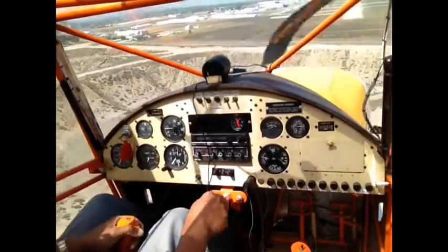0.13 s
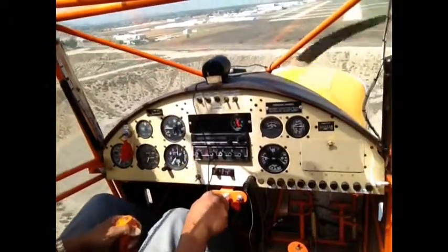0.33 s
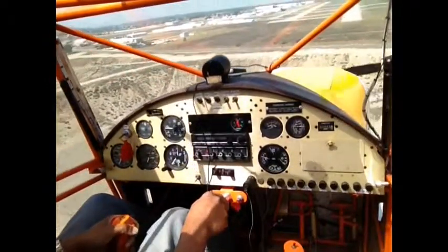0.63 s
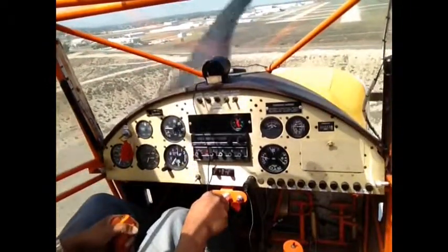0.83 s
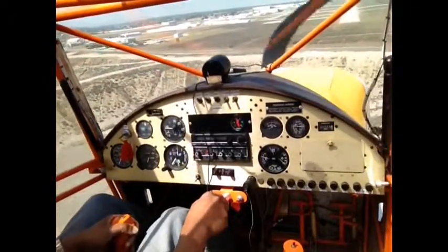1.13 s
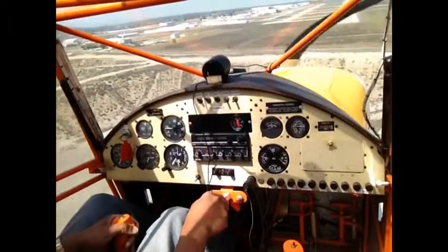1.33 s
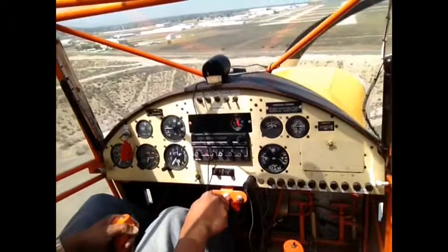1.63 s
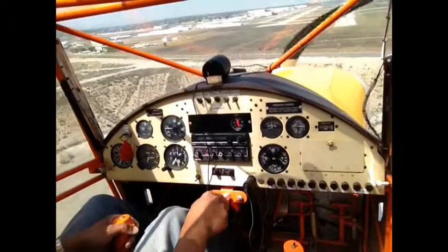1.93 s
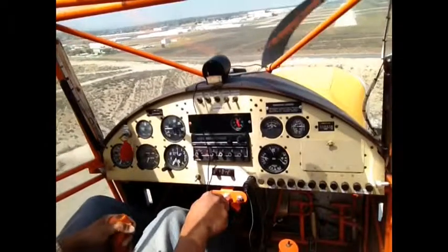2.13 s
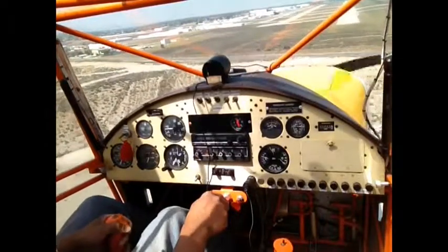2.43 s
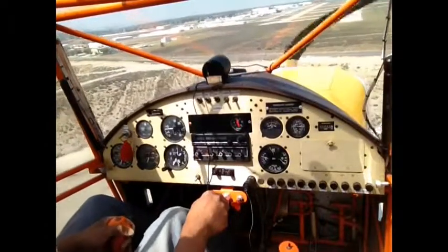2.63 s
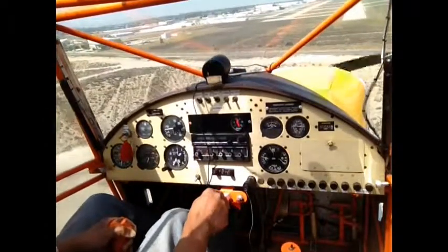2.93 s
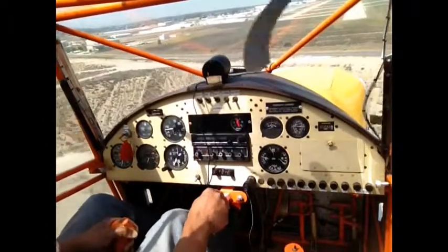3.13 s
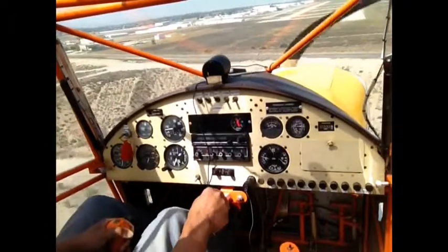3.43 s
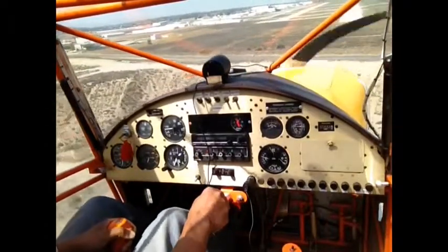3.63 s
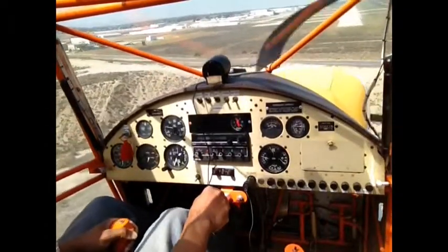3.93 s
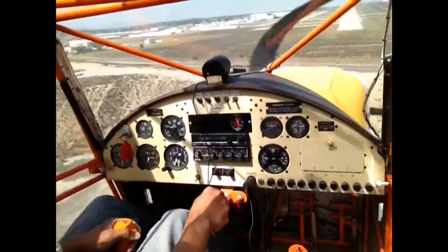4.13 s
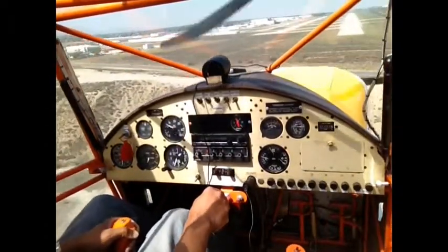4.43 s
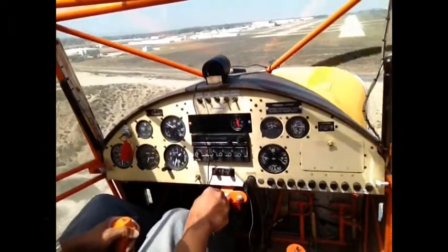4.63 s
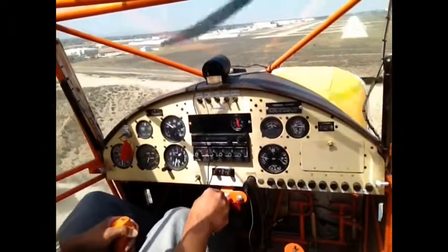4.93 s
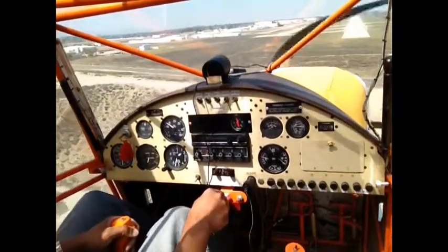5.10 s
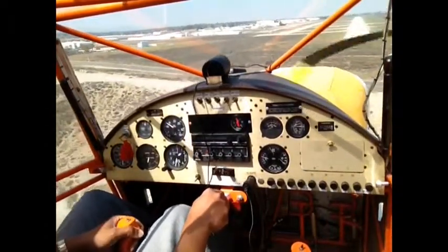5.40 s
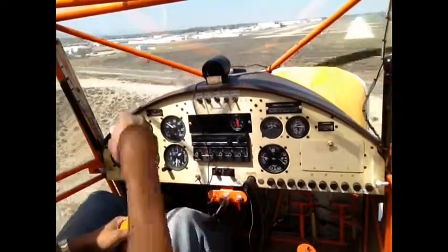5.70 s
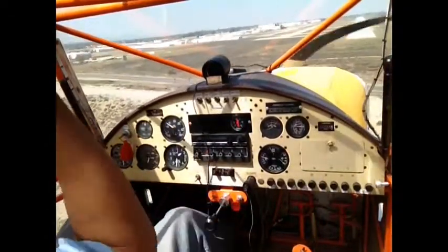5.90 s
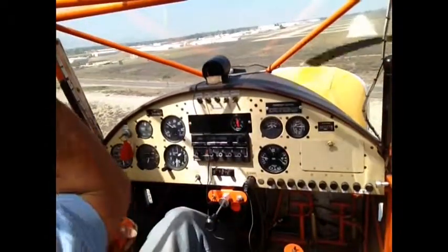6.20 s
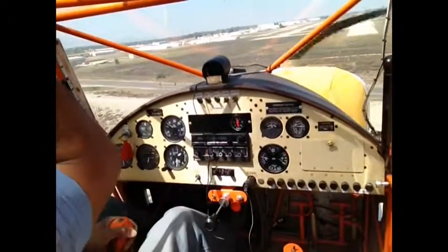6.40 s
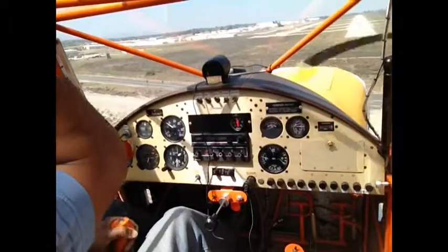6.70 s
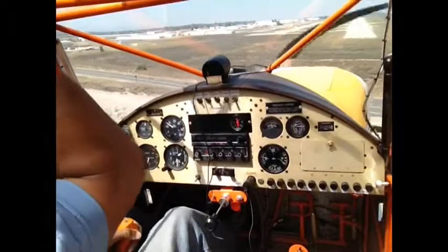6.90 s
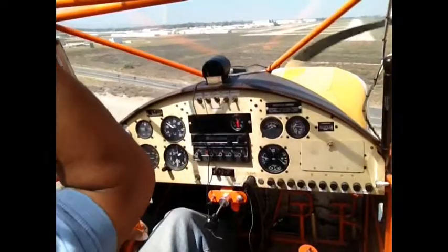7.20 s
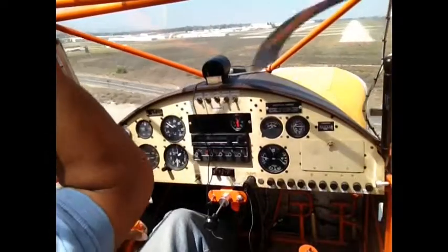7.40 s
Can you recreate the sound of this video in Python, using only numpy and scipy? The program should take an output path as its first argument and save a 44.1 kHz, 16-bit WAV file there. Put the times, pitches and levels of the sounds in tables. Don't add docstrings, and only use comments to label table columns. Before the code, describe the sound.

Inside a small propeller plane on approach, the engine idles low under rumbling, hissing slipstream and faint door-gap whistles, with a few tiny trim ticks. Near the middle the throttle opens and the drone climbs to a strong steady roar. The close cabin microphone overloads, stuttering with brief dropouts and popping thuds, including two harder flurries of knocks late on.

```python
import sys
import numpy as np
from scipy import signal
from scipy.fft import rfft, irfft, next_fast_len
from scipy.io import wavfile
from scipy.ndimage import uniform_filter1d, map_coordinates

SR = 44100
rng = np.random.default_rng(int(sys.argv[2]) if len(sys.argv) > 2 else 0)


def unload_wav(signal):
    wavfile.write(
        sys.argv[1],
        SR,
        np.round(np.clip(np.atleast_2d(signal).T, -1, 1) * 32767).astype(np.int16),
    )


def decibels_to_gain(level_db):
    exponent = np.asarray(level_db, float) / 20
    return 10 ** exponent


N = 332955

# time_s, firing_hz
FIRING_RATE = [(0, 31.5), (1, 30.4), (1.7, 29.2), (2.3, 28.18), (3.3, 27.3), (3.55, 28.46), (3.8, 33.47),
               (4, 37.65), (4.3, 41.4), (4.6, 43.3), (4.85, 44.43), (5.3, 43.87), (6.2, 43.42),
               (7.55, 43.45)]
# time_s, load_0_to_1
THROTTLE_LOAD = [(0, 0.15), (.5, 0), (1.1, .15), (1.7, 0.44), (2.3, 0.08), (3.3, 0.17), (3.6, 0.1),
                 (3.95, .65), (4.4, 0.99), (7.55, 0.94)]
# firing_rate_multiple, level_db
ENGINE_ORDERS = [(1, -19), (1.5, -36), (2, -9), (2.5, -16), (3, 0.5), (3.5, -20.5), (4, -21.5),
                 (4.5, -14.5), (5, -15), (6, -19.5)]
# time_s, level_db
SLIPSTREAM = [(0.0, -35), (0.71, -34), (1.14, -35), (1.45, -35.5), (3.55, -37), (4.5, -33), (4.88, -33.5),
              (6.01, -35.5), (6.5, -34.5), (6.69, -34.5), (7.42, -34.5), (7.55, -31.5)]
# time_s, level_db
GAP_DRAUGHT = [(0, 1.5), (.7, 3.5), (1.6, -4), (2.2, 1), (3.15, -1), (3.75, 0), (5, 3), (7.55, -1.5)]
# freq_hz, density_db
IDLE_RUMBLE = [(20, -40), (40, -7), (65, -20), (85, -8.5), (110, 0), (145, 2), (200, -3.5), (260, -12),
               (340, -17.5), (500, -32), (900, -59)]
# freq_hz, density_db
POWER_RUMBLE = [(20, -45), (40, -31), (65, -15), (85, -10.5), (110, -3), (140, 0), (185, -0.5), (230, -7),
                (330, -15), (500, -35.5), (900, -58)]
# freq_hz, density_db
HULL_SPECTRUM = [(150, -15.5), (260, -19.5), (323, -2), (422, -5.5), (493, 1), (564, -8), (620, -8),
                 (811, -16.5), (1000, -19.5), (1100, -24.5), (1300, -35), (1690, -45), (2860, -120)]
# freq_hz, density_db
PANEL_SPECTRUM = [(700, -47), (1100, -3.5), (1600, -3), (2000, -6), (2400, -9.5), (3000, -13), (4100, -18),
                  (4400, -29), (6000, -58)]
# freq_hz, density_db
LEAK_SPECTRUM = [(3000, -23), (4300, -4.5), (5000, -2), (6100, -4), (8300, -1.5), (9100, -1.5), (10700, 3),
                 (12500, -3), (13500, -5), (15200, -12), (16000, -40)]
# centre_hz, width_hz, level_db
GAP_CAVITIES = [(1783, 150, 3), (2642, 240, 4), (4076, 68, -13.5), (4950, 260, -10.5), (8380, 250, -14)]
# start_s, peak_db
TRIM_TICKS = [
    (0.2493, -33),
    (0.9744, -48),
    (1.4321, -39),
    (1.4784, -46),
    (1.6317, -34),
    (1.6994, -45),
    (2.1708, -50),
    (4.5707, -39),
]
STOP_BRUSHES = [.1172, 0.1394, 0.148, 0.976, 3.8943, 3.9819, 4.0858, 4.3479, 4.544, 4.5632, 4.5927, 4.6993,
                4.972, 5.3315, 5.4533, 5.5325, 5.5398, 5.6515, 5.9329, 6.156, 6.1735, 6.1802, 6.3378,
                6.4407, 6.4742, 6.61, 6.7296, 7.1679, 7.2771, 7.4828]
# start_s, length_ms, depth_db, slope_per_ms
STOP_PINS = [(3.6006, 4.9, -24, 0.38), (4.826, 23, -35, 0.45), (4.8621, 16, -17, -0.17),
             (5.033, 19.5, -55, -.25), (5.0584, 30.7, -73, 0.5), (5.1057, 4.7, -35, 0.51),
             (5.123, 27.2, -57, -0.65), (5.3509, 20.6, -23.5, -0.56), (5.4694, 17.5, -27, 0.62),
             (5.5584, 20.1, -28, 0.65), (5.5896, 17.2, -44, 0.43), (6.0339, 21, -41, -0.73),
             (6.6564, 17, -24, 0.67), (5.7442, 9.4, -12, 0.7), (6.7661, 2.9, -25, -0.6),
             (6.7716, 14.2, -29, -0.026), (6.7987, 14, -21, 0.53), (6.856, 15.6, -29, -0.4),
             (6.8848, 10.6, -25, 0.43), (7.0011, 9.4, -39, -0.39), (7.0205, 19, -36, 0.76),
             (7.0676, 10.1, -17, .6), (7.0855, 18.6, -21.5, -0.45), (7.1314, 16.8, -38, -.45),
             (7.2469, 18, -21, -0.0015), (7.2955, 16.3, -48, 0.42), (7.355, 10.6, -30, -0.39),
             (7.408, 3.56, -30, -0.46), (7.5143, 22.5, -38, .2), (7.5439, 4.85, -33, -0.43)]
# start_s, length_ms, depth_db, stopped_slope_per_ms, resumed_slope_per_ms
STOP_SLAMS = [
    (6.3571, 4.9, -20, -.8, -1),
    (6.3688, 11.5, -16, -1.5, -2.5),
    (6.3815, 6.9, -36, 2.5, 2),
    (6.39, 5.7, -25, -1, -0.5),
    (6.3985, 12, -33, 1.3, 1),
    (6.418, 9.5, -26, -.7, 0),
    (6.9495, 9.67, -36, -1.5, -1),
    (6.9605, 0.74, -2, 0.3, 1.2),
    (6.9624, 5.67, -26, -1.5, -1.66),
    (6.9696, 15.2, -25, 1.9, -0.25),
]

TONE_DB, TONE_LOAD_DB = -40, 17
RUMBLE_DB, RUMBLE_LOAD_DB = -28.5, 3
HULL_DB, PANEL_DB, LEAK_DB, WHISTLE_DB = -35, -49, -56, -58
RUMBLE_GROWS, HULL_GROWS, PANEL_GROWS, LEAK_GROWS, WHISTLE_GROWS = 1, 0.77, 0.79, 0.43, 1.4
BRUSH_MS, BRUSH_DB, BRUSH_SLOPE_PER_MS = (4.5, 9.07), -15.5, (0.067, 0.41)
CREEP_MS = 0.9
SNAP = 0.008
AIR_CUT_HZ, MIC_CUT_HZ, TOP_HZ = 64.0, 175.4, 15300


def unit(x):
    return x / np.sqrt(np.mean(x ** 2) + 1e-20)


def curve(rows):
    time_s, value = np.transpose(rows)
    return np.interp(np.arange(N) / SR, time_s, value)


def wobble(rate_hz):
    coarse = np.arange(0, N + 64, 64)
    knots = rng.standard_normal(int(N * rate_hz / SR) + 4)
    return np.interp(np.arange(N), coarse, map_coordinates(knots, [coarse * rate_hz / SR]))


def filtered(x, response):
    m = next_fast_len(N + SR)
    return irfft(rfft(x, m) * response(np.fft.rfftfreq(m, 1 / SR)), m)[..., :N]


def bass_cut(hz, corner_hz):
    s = 1j * hz / corner_hz
    first = s * s + 2 * np.cos(np.pi / 8) * s + 1
    second = s * s + 2 * np.cos(3 * np.pi / 8) * s + 1
    return s ** 4 / (first * second)


def rush(spectrum, patchy_db):
    z = signal.stft(rng.standard_normal(N + 512), nperseg=512)[2]
    field = uniform_filter1d(rng.standard_normal(z.shape), size=6, axis=0)
    field = uniform_filter1d(field, size=10, axis=1)
    noise = signal.istft(z * decibels_to_gain(patchy_db * unit(field)), nperseg=512)[1][:N]
    freq_hz, db = np.transpose(spectrum)
    return unit(filtered(noise, lambda hz: decibels_to_gain(np.interp(np.log(hz + 1), np.log(freq_hz + 1), db))))


def engine_tones(turn, firing_hz):
    load_db = 0.76 * (firing_hz - 44)
    tones = np.zeros(N)
    for order, db in ENGINE_ORDERS:
        order_db = db + 0.71 * wobble(5)
        if order != 3:
            order_db = order_db + load_db
        tones += decibels_to_gain(order_db) * np.sin(order * turn + rng.uniform(0, 2 * np.pi))
    return tones


def hull_rumble(gust, beat, firing_hz):
    power = np.clip((firing_hz - 32) / 11, 0, 1)
    idle = np.sqrt(1 - power) * rush(IDLE_RUMBLE, patchy_db=0.6)
    boom = np.sqrt(power) * rush(POWER_RUMBLE, patchy_db=0.6)
    return unit(decibels_to_gain(0.6 * gust + 0.6 * wobble(12) + 1.2 * beat) * (idle + boom))


def hull_resonance(gust, beat):
    return unit(decibels_to_gain(0.28 * gust + 0.82 * beat) * rush(HULL_SPECTRUM, patchy_db=1.36))


def panel_buzz(gust, beat):
    return unit(decibels_to_gain(0.31 * gust + 0.9 * beat) * rush(PANEL_SPECTRUM, patchy_db=1.3))


def leak_hiss(gust, beat):
    return unit(decibels_to_gain(0.5 * gust + 0.22 * beat) * rush(LEAK_SPECTRUM, patchy_db=0.7))


def whistles():
    draught = rng.standard_normal(N)
    total = np.zeros(N)
    for centre_hz, width_hz, db in GAP_CAVITIES:
        def cavity(hz):
            return (hz * width_hz / (centre_hz ** 2 - hz * hz + 1j * hz * width_hz)) ** 2
        total += decibels_to_gain(db + 1.3 * wobble(3.2)) * unit(filtered(draught, cavity))
    return total


def cabin():
    firing_hz, load = curve(FIRING_RATE), np.clip(curve(THROTTLE_LOAD), 0, 1)
    air_db = curve(SLIPSTREAM)
    air_db = air_db - air_db.mean()
    turn = 2 * np.pi * np.cumsum(firing_hz * (1 + 0.0019 * wobble(6))) / SR
    beat = np.cos(turn)
    gust = 0.17 * wobble(2.86) + 0.63 * wobble(22)
    rumble_db = RUMBLE_DB + RUMBLE_LOAD_DB * load + RUMBLE_GROWS * air_db
    whistle_db = WHISTLE_DB + WHISTLE_GROWS * air_db + curve(GAP_DRAUGHT)
    whistle_db = whistle_db - 4.5 - 0.25 * (firing_hz - 31.5)
    mix = decibels_to_gain(TONE_DB + TONE_LOAD_DB * load) * engine_tones(turn, firing_hz)
    mix += decibels_to_gain(rumble_db) * hull_rumble(gust, beat, firing_hz)
    mix += decibels_to_gain(HULL_DB + HULL_GROWS * air_db) * hull_resonance(gust, beat)
    mix += decibels_to_gain(PANEL_DB + PANEL_GROWS * air_db) * panel_buzz(gust, beat)
    mix += decibels_to_gain(LEAK_DB + LEAK_GROWS * air_db) * leak_hiss(gust, beat)
    return mix + decibels_to_gain(whistle_db) * whistles()


def ticks():
    x, t_s = np.zeros(N + SR), np.arange(300) / SR
    for start_s, db in TRIM_TICKS:
        click = decibels_to_gain(db + 5 - 60 * t_s / 0.005) * rng.standard_normal(len(t_s))
        x[round(start_s * SR):][:len(t_s)] += click
    return filtered(x[:N], lambda hz: (hz / 12000) ** 3 / (1 + (hz / 12000) ** 3))


def stops():
    brushes = []
    for start_s in STOP_BRUSHES:
        length_ms, sign = rng.uniform(*BRUSH_MS), rng.choice([-1, 1])
        stopped, resumed = sign * rng.uniform(*BRUSH_SLOPE_PER_MS, size=2)
        brushes.append((start_s, length_ms, BRUSH_DB, stopped, resumed))
    pins = [(*pin, pin[-1]) for pin in STOP_PINS]
    return brushes + pins + list(STOP_SLAMS)


def overload(air):
    passing, bends, snaps = np.ones(N + SR), np.zeros(N + SR), np.zeros(N + SR)
    slope = np.diff(air, prepend=0)
    own = np.pad(uniform_filter1d(slope, size=61), (0, SR)) * SR / 1000
    for start_s, length_ms, depth_db, stopped, resumed in stops():
        start, end = round(start_s * SR), round((start_s + length_ms / 1000) * SR)
        passing[start + round(0.0003 * SR):end] = decibels_to_gain(depth_db)
        lost = 1 - decibels_to_gain(depth_db)
        knee = round(1 + 28 / (0.44 + stopped ** 2))
        bends[start - knee // 2:][:knee] += (stopped + lost * own[start]) / knee
        knee = round(1 + 10 / (0.89 + resumed ** 4))
        bends[end - knee // 2:][:knee] += (resumed - lost * own[end]) / knee
        snaps[end] = SNAP * resumed * abs(resumed)
    power = np.clip((curve(FIRING_RATE) - 33) / 10, 0, 1)
    passing[:N] *= 1 - 0.6 * (wobble(260) > 3.2 - 1.1 * power)
    keep = np.exp(-1000 / (CREEP_MS * SR))
    eased = signal.lfilter([1 - keep], [1, -keep], passing - 1) + 1
    passing = np.maximum(passing, eased)[:N]
    swing = np.cumsum(bends[:N]) * 1000 / SR
    return passing * slope + swing + snaps[:N]


def thinned(x):
    hz, _, z = signal.stft(x, SR, nperseg=1024)
    band = np.arange(len(hz)) // 4
    luck = rng.standard_normal((band[-1] + 1, z.shape[1]))
    luck = unit(uniform_filter1d(luck, size=5, axis=1))
    power = uniform_filter1d(np.abs(z) ** 2, size=24, axis=0) + 1e-20
    flare_db = np.abs(10 * np.log10(power / np.median(power, axis=1, keepdims=True)))
    kept = 0.6 * flare_db + 4 * luck[band] > (hz[band * 4, None] - 14300) / 210
    kept = kept | (hz < 12800)[:, None]
    return signal.istft(z * kept, SR, nperseg=1024)[1][:N]


def scene():
    def restore(hz):
        return bass_cut(hz, AIR_CUT_HZ) / (bass_cut(hz, MIC_CUT_HZ) + 1e-12)
    return filtered(cabin() + ticks(), restore)[None]


def roll_off(x):
    return signal.sosfilt(signal.butter(12, 15300, fs=SR, output="sos"), x)


def record(dry):
    def microphone(hz):
        summing = 1 / (1 - np.exp(-2j * np.pi * hz / SR) + 1e-12)
        return summing * bass_cut(hz, MIC_CUT_HZ) * (hz < TOP_HZ)
    x = filtered(overload(dry[0]), microphone)
    return roll_off(thinned(x)[None])


dry = scene()
out = record(dry)
unload_wav(out)
```